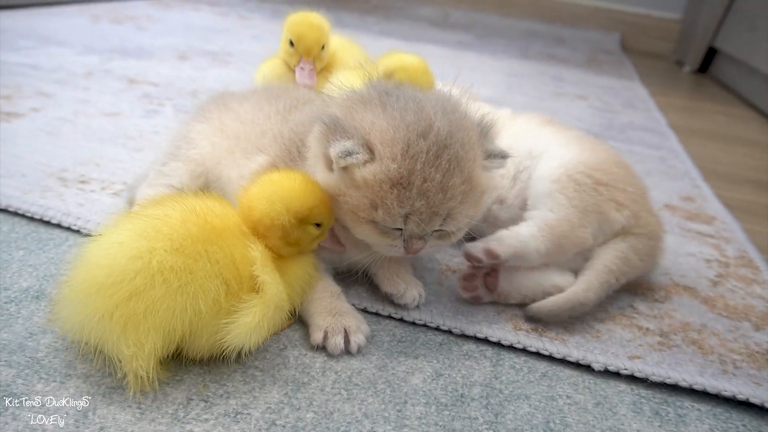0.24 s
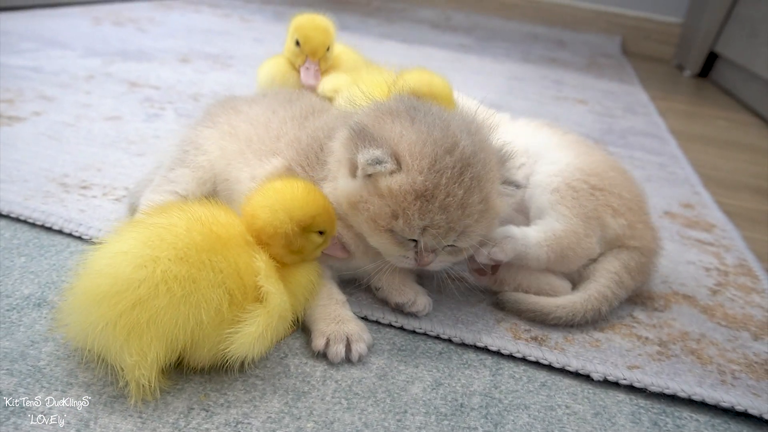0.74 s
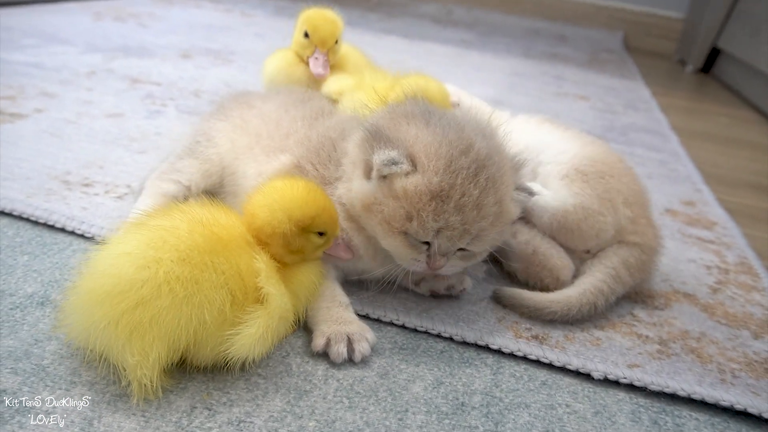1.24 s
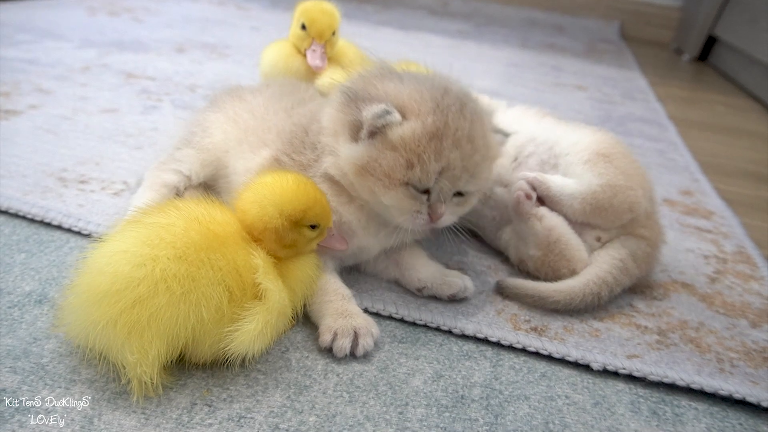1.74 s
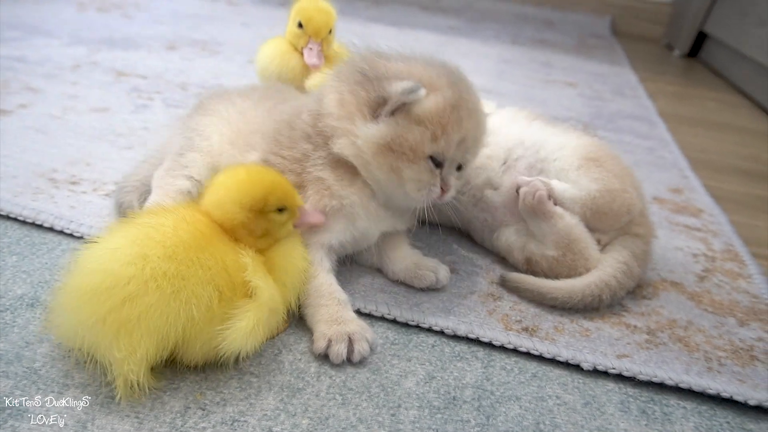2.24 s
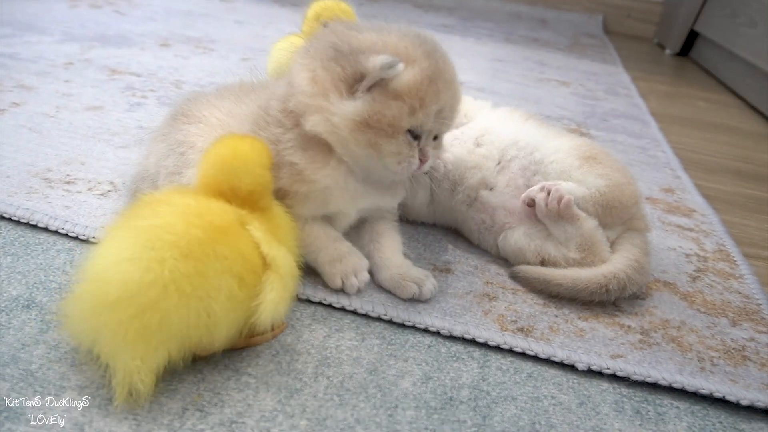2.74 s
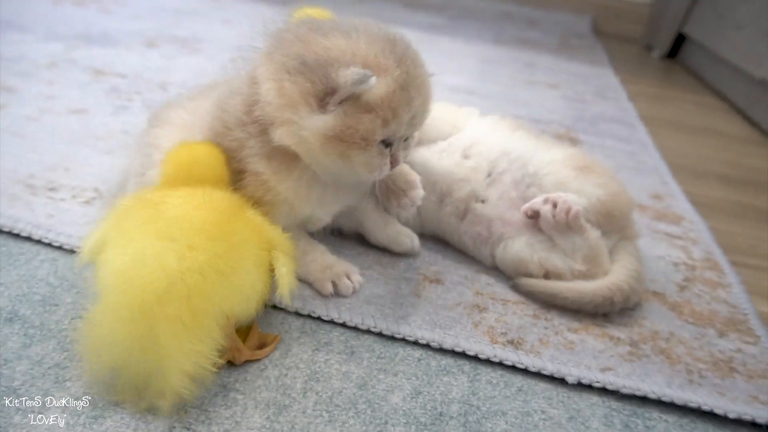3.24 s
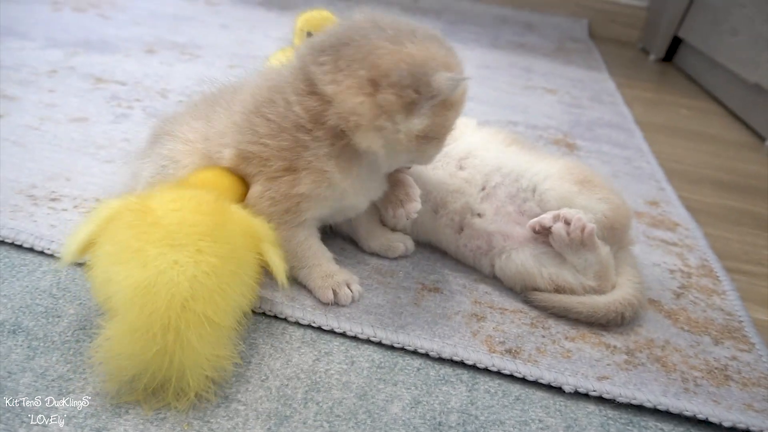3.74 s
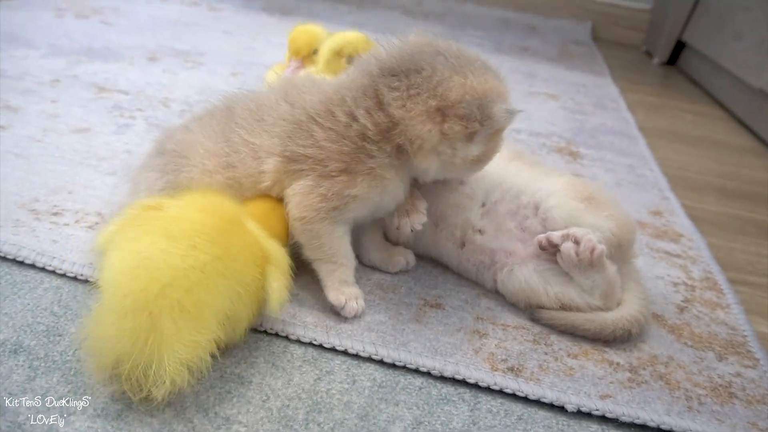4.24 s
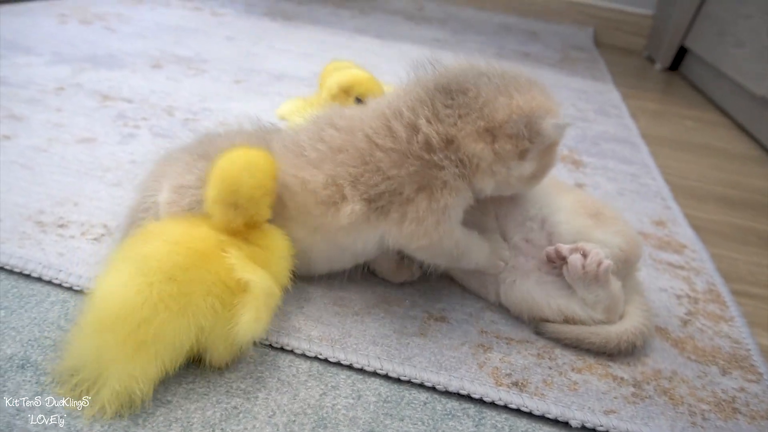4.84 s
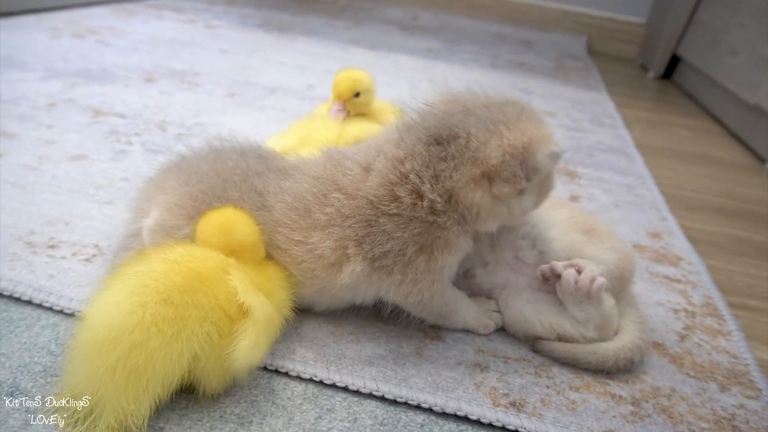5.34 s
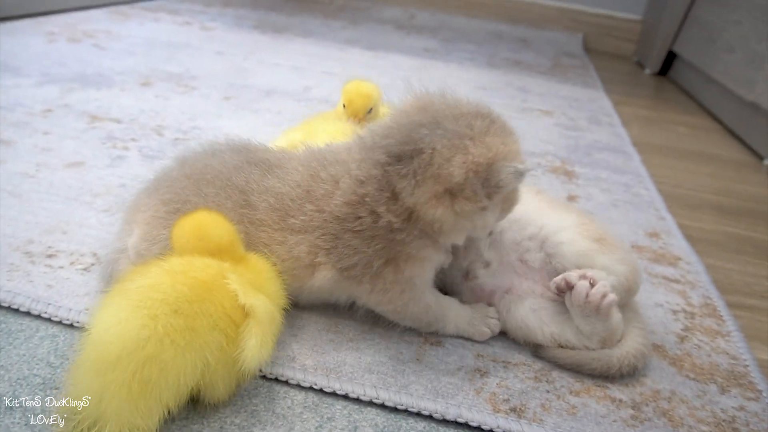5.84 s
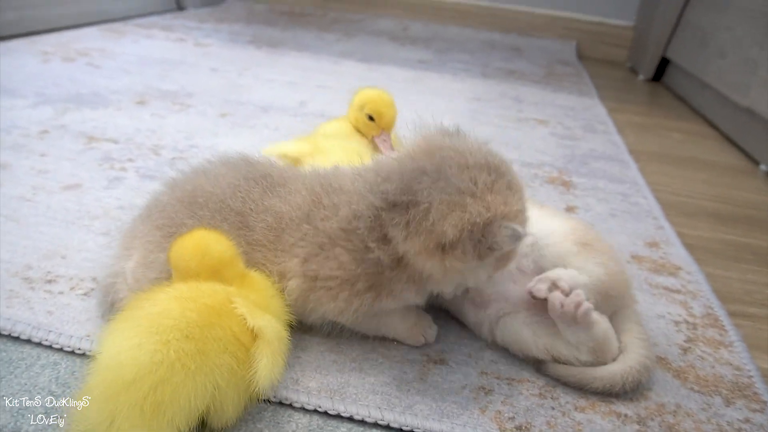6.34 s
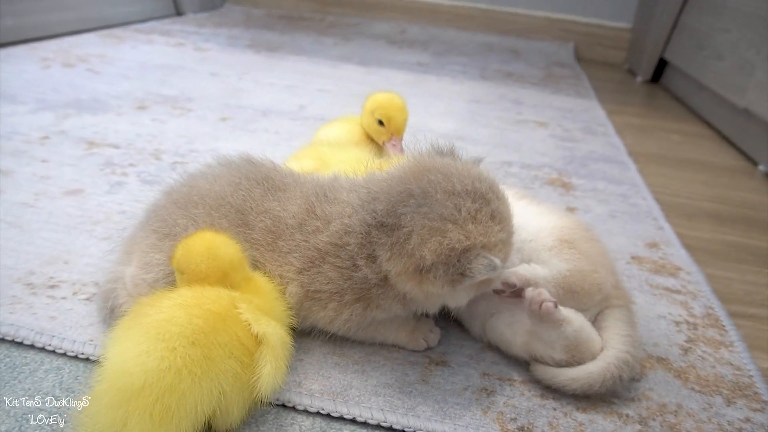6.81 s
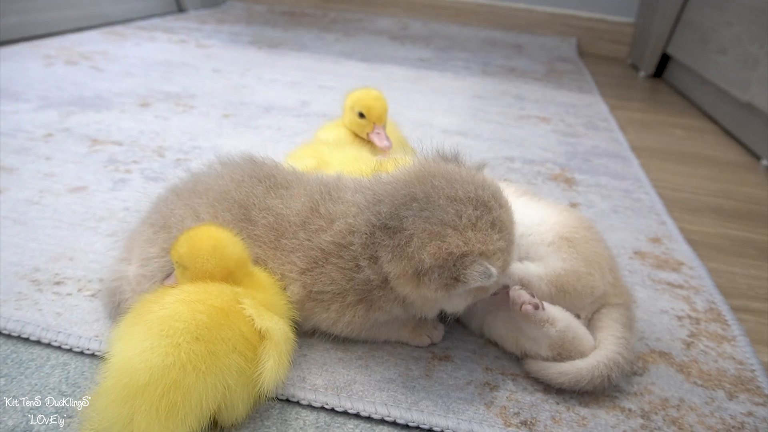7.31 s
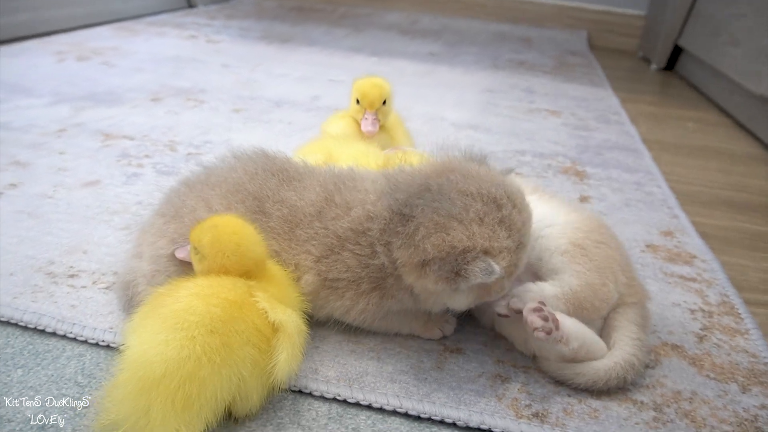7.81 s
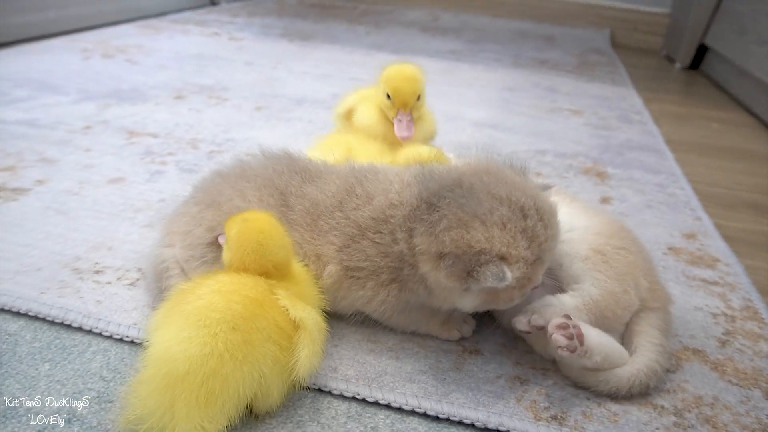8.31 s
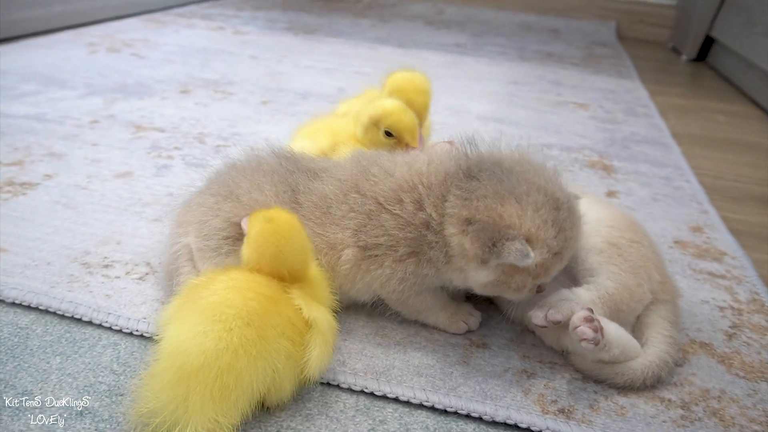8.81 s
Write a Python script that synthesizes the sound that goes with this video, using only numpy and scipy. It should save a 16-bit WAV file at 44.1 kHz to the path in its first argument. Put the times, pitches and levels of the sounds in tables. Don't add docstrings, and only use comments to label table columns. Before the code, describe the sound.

Ducklings peep close to stereo microphones in a small, quiet room with a short soft reverberation. From 0.1 s one bird calls about every 0.3 s, each peep a tenth-second whistle near 4 kHz that leaps up, holds, then drops, slightly hoarse in its middle. Short lower chirps slip between, and a thin nostril whistle is barely heard in the first second. From 1.8 to 3 s the caller softens and lowers. From 3.1 s companions answer strongly while its own peeps turn higher, weaker and raspier. A sharp tick falls at 3.4 s. At 4.8 s it bursts out loud and clear, then gradually descends, ending near 6.8 s. A quiet gap has two faint chirps around 7.5 s; from 7.9 to 9.1 s thin, shrill peeps return. Faint rug rustles, small claw ticks, soft footfalls, low appliance hum, rumble and hiss lie underneath.

```python
import sys
import numpy as np
from scipy import signal
from scipy.fft import rfft, irfft, next_fast_len
from scipy.io import wavfile
from scipy.ndimage import uniform_filter1d, map_coordinates

SR = 44100
rng = np.random.default_rng(int(sys.argv[2]) if len(sys.argv) > 2 else 0)


def to_linear_factor(level_db):
    exponent = np.asarray(level_db, float) / 20
    return 10 ** exponent


def unload_audio(sound):
    columns = np.transpose(np.atleast_2d(sound))
    steps = np.round(np.clip(columns, -1, 1) * 32767)
    wavfile.write(sys.argv[1], SR, steps.astype(np.int16))


N = 399974


def unit(x):
    return x / np.sqrt(np.mean(x ** 2) + 1e-20)


def along(points, hz):
    f, v = np.transpose(points)
    return np.interp(np.log(hz + 1), np.log(f + 1), v)


def wobble(size, rate):
    knots = rng.standard_normal(int(max(size, SR // 4) * rate / SR) + 4)
    return map_coordinates(knots, [np.arange(size) * rate / SR])


def noise(size, gain):
    m = next_fast_len(max(size, SR // 5) + 512)
    spectrum = rfft(rng.standard_normal(m)) * gain(np.fft.rfftfreq(m, 1 / SR))
    return unit(irfft(spectrum, m)[:size])


# (frequency [Hz], left-right correlation)
STEREO_LIKENESS = [(60, 1), (180, 0.91), (550, 0.078), (1650, -0.0075), (4970, 0.27), (15000, 0.25)]


def wide(gain):
    hz = np.fft.rfftfreq(N, 1 / SR)
    turn = np.arccos(np.clip(along(STEREO_LIKENESS, hz), -1, 1)) / 2
    spectrum = rfft(rng.standard_normal((2, N))) * gain(hz)
    mid, side = irfft(spectrum * [np.cos(turn), np.sin(turn)], N)
    return unit(np.array([mid + side, mid - side]))


def add(mix, s, sound, pan_db):
    part = mix[:, round(s * SR):][:, :sound.shape[-1]]
    part += to_linear_factor(np.array([[pan_db / 2], [-pan_db / 2]])) * sound[..., :part.shape[1]]


def glide(rows, bend=0.0043, edge=0.00044):
    s, hz, db = np.transpose(rows)
    t = np.arange(s[0], s[-1], 1 / SR)
    leap_s = s[1] - s[0]

    def warped(power):
        return np.where(t < s[1], s[0] + leap_s * ((t - s[0]) / leap_s) ** power, t)

    pitch = np.interp(warped(.55), s, hz)
    pitch = uniform_filter1d(pitch, int(bend * SR) + 1, mode="nearest")
    fade = np.clip(np.minimum(t - s[0], s[-1] - t) / edge, 0, 1)
    size = np.sqrt(2) * to_linear_factor(np.interp(warped(1.0), s, db)) * fade
    return 2 * np.pi * np.cumsum(pitch) / SR, size, (t - s[0]) / (s[-1] - s[0])


# (time [s], left-right difference [dB])
LEAD_HEAD = [
    (.2, -2),
    (3.2, -2.5),
    (3.4, 5),
    (4.3, 1),
    (4.9, 4),
    (5.8, 6.5),
    (6.8, 1.5),
]
# (start [s], length [s], crest pitch [Hz], level [dB], hoarse breath level [dB])
CALM = [
    (0.136, .11, 3980, -36.5, -55),
    (0.41, 0.098, 3986, -34.5, -57),
    (0.695, .113, 3990, -35.5, -55),
    (0.974, .114, 4120, -35.5, -55),
    (1.257, 0.11, 4070, -37.5, -56.5),
    (1.548, 0.095, 3920, -39, -60.5),
]
DROWSY = [
    (1.853, 0.1, 3860, -38, -59.5),
    (2.172, 0.098, 3730, -40.5, -64),
    (2.498, 0.11, 3725, -40, -58.5),
    (2.79, .104, 3850, -35.5, -56.5),
    (3.09, 0.085, 3800, -35, -61),
]
JOSTLED = [
    (3.416, 0.12, 4460, -40, -50),
    (3.692, 0.1, 4560, -41, -49.5),
    (3.956, 0.13, 4380, -44.5, -56),
    (4.238, 0.12, 4500, -46, -51.5),
    (4.511, 0.13, 4355, -42.5, -49.5),
]
ROUSED = [
    (4.803, 0.1, 4077, -30, -52.5),
    (5.099, 0.11, 4370, -31.5, -52.5),
    (5.402, 0.11, 4555, -37.5, -53.5),
    (5.724, .11, 4410, -36.5, -54.5),
    (6.048, 0.11, 4240, -37.5, -60),
    (6.369, 0.11, 4186, -36.5, -60),
    (6.735, 0.098, 3934, -38, -64.5),
]


def lead_duckling():
    moods = [(CALM, "calm"), (DROWSY, "drowsy"), (JOSTLED, "jostled"), (ROUSED, "roused")]
    return sum(duckling(peeps, kind, LEAD_HEAD) for peeps, kind in moods)


# (time [s], left-right difference [dB])
REPLY_HEAD = [
    (.6, 1),
    (2.2, -.5),
    (3, 3),
    (3.5, -3.5),
    (5.2, 0.5),
    (8.9, -1.5),
]
# (start [s], length [s], crest pitch [Hz], level [dB], hoarse breath level [dB])
ARCHES = [(3.143, .107, 3720, -32, -67), (3.735, .09, 3650, -43, -57.5), (4.025, .104, 3600, -39, -59),
          (4.29, .099, 3690, -34, -58), (4.565, .13, 3620, -34, -58), (4.885, .102, 3720, -37, -58),
          (5.195, .104, 3700, -43, -59.5), (7.975, .064, 3560, -51, -72), (3.445, .082, 3700, -38, -64),
          (4.345, .082, 4620, -50, -64), (4.685, .083, 4670, -50, -61)]
CHIRPS = [(0.482, .047, 3093, -44.5, -72), (0.618, .062, 3870, -43, -98), (1.13, .06, 2470, -42, -72),
          (1.273, .057, 2730, -40.5, -66), (1.535, .045, 2570, -42.5, -70), (2.058, .047, 2500, -39, -69),
          (2.18, .069, 3036, -39, -72), (2.562, .056, 2704, -40, -104), (2.622, .05, 3100, -43, -91),
          (2.713, .076, 3110, -36, -79.5), (2.875, .05, 3300, -42.5, -79), (7.452, .052, 3510, -47.5, -102),
          (7.597, .049, 3550, -47.5, -95), (8.866, .068, 3260, -38.5, -67.5)]
SHRILL = [
    (7.946, .1, 4950, -56, -62),
    (8.227, 0.099, 4650, -44, -66.5),
    (8.503, .1, 4620, -43.5, -62.5),
    (8.768, 0.12, 4820, -42.5, -57.5),
    (8.808, .066, 3870, -45, -60),
    (9.048, 0.067, 4690, -41.5, -59),
]


def companions():
    voices = [(ARCHES, "arch"), (CHIRPS, "chirp"), (SHRILL, "shrill")]
    return sum(duckling(peeps, kind, REPLY_HEAD) for peeps, kind in voices)


# (frequency [Hz], gain [dB])
BEAK = [(2000, -8.5), (2500, -0.5), (3000, -1), (3400, -6), (3650, 1.5), (3950, -2.5), (4250, -1.5),
        (4700, -2.5)]
# (frequency [Hz], density [dB per Hz])
BREATH = [(500, -25), (850, -4.5), (1400, -2), (2800, 1.5), (5000, 4), (6000, -6), (8500, -9),
          (10000, -11.5), (15500, -30.5)]
SHAPES = dict( calm=dict(start=.67, leap_s=.02, shelf=.905, rest=.5, peak=.78, droop=.965, fall_s=.03, halfway=.46, end_hz=2350),
          drowsy=dict(start=.68, leap_s=.017, shelf=.875, rest=.1, peak=.82, droop=.985, fall_s=.036, halfway=.48, end_hz=2350),
          jostled=dict(start=.66, leap_s=.019, shelf=.92, rest=.15, peak=.7, droop=.95, fall_s=.028, halfway=.48, end_hz=2450),
          roused=dict(start=.64, leap_s=.019, shelf=.895, rest=.12, peak=.58, droop=.955, fall_s=.028, halfway=.5, end_hz=2400),
          arch=dict(start=.7, leap_s=.018, shelf=.945, rest=.35, peak=.78, droop=.97, fall_s=.029, halfway=.5, end_hz=2300),
          chirp=dict(start=.85, leap_s=.012, shelf=.98, rest=.2, peak=.6, droop=.97, fall_s=.07, halfway=.62, end_hz=2000),
          shrill=dict(start=.62, leap_s=.023, shelf=.965, rest=.1, peak=.45, droop=.94, fall_s=.05, halfway=.68, end_hz=2550))
# (first overtone [dB], onset [dB], shelf [dB], mid-fall [dB], fall end [dB])
LEVELS = dict(calm=(-19.5, -9.5, -2, -1.5, -2.5), drowsy=(-19, -12.5, -5, -3.5, -4.5),
          jostled=(-18, -3.5, -1.5, -1.5, -5.5), roused=(-22, -11, -2.5, -3.5, -7.5),
          arch=(-21, -16, -3.5, 0, -3.5), chirp=(-21.5, -7, -5, -2, -4.5), shrill=(-15.5, -4.5, 2, 5, -1.5))


def duckling(peeps, kind, head):
    mix = np.zeros((2, N))
    octave_db, *contour_db = LEVELS[kind]
    for s, length, crest_hz, level_db, breath_db in peeps:
        rows = arch(s, length, crest_hz, level_db, contour_db, **SHAPES[kind])
        phase, size, progress = glide(rows)
        n = len(phase)
        beak = to_linear_factor(along(BEAK, np.gradient(phase) * SR / (2 * np.pi)))
        effort = np.clip(np.minimum((progress - .12) / .22, (.85 - progress) / .3), 0, 1)
        loudest_db = max(row[2] for row in rows)
        rough = effort * min(to_linear_factor(breath_db - loudest_db + 8.5), .38)

        phase = phase + rough * wobble(n, 1208)
        phase = phase + (.2 + .25 * effort + 1.8 * rough) * wobble(n, 260)
        phase = phase + crest_hz / 4000 * effort * wobble(n, 75)
        tone = beak * np.sin(phase) * to_linear_factor((2.44 + 2.5 * rough) * wobble(n, 221))

        for k, db in enumerate([0, -9, -21]):
            richness = (0.81 + 0.12 * effort) ** (1 + k) * (size / to_linear_factor(-48.0)) ** (0.12 * k)
            overtone = to_linear_factor(octave_db + db + 4.54 * wobble(n, 87)) * np.sin((k + 2) * phase)
            tone += richness * overtone

        period = rng.integers(2, 4)
        under = np.zeros(n)
        for k in (period - 1, period + 1):
            patches = to_linear_factor(4 * wobble(n, 61))
            under += patches * np.sin(k / period * phase + 1.2 * wobble(n, 300))

        puffs = to_linear_factor(1.8 * wobble(n, 450) + 2.5 * wobble(n, 45))
        air = noise(n, lambda hz: to_linear_factor(along(BREATH, hz))) * puffs
        hoarse = to_linear_factor(breath_db) * (to_linear_factor(7.5) * air + to_linear_factor(-5.5) * under)
        call = size * tone + effort * hoarse
        pan_db = np.interp(s, *np.transpose(head))
        add(mix, s, call, pan_db)
        add(mix, s, room(call), 0.19 * pan_db)
    return mix


def arch(s, length, crest_hz, db, levels, start, leap_s, shelf, rest, peak, droop, fall_s, halfway, end_hz):
    onset_db, shelf_db, falling_db, end_db = levels
    cut_s, cut_db = 0.0084, -3.5
    hold = max(length - leap_s - fall_s, .011)
    drop = leap_s + hold
    end = end_hz / crest_hz
    middle = droop + halfway * (end - droop)
    last = end + (middle - end) * 2 * cut_s / (length - drop)
    corners = [(0, start, onset_db),
               (leap_s, shelf, shelf_db),
               (leap_s + rest * hold, .985 * shelf, shelf_db / 2),
               (leap_s + peak * hold, 1, 0),
               (drop, droop, falling_db / 4),
               ((drop + length) / 2, middle, falling_db),
               (length - cut_s, last, end_db),
               (length, end, end_db + cut_db)]
    return [(s + t, crest_hz * share, db + under_db) for t, share, under_db in corners]


# (time [s], rustle level [dB], rumble level [dB])
RUSTLE = [(0, -77, -64), (.08, -78, -56), (.7, -67.5, -59), (1.5, -76, -60), (1.77, -70.5, -58.5),
          (2.3, -79.5, -60), (3.05, -72.5, -59.5), (3.3, -75.5, -60), (3.65, -74, -60.5), (4.5, -67.5, -58),
          (5.6, -73.5, -60.5), (7, -84, -60), (9.07, -76.5, -60.5)]
# (frequency [Hz], density [dB per Hz])
RUG = [(300, -28.5), (700, -4.5), (1500, -7.5), (3500, -3), (6000, -15.5), (12000, -19.5), (16000, -31)]
# (time [s], scrape level [dB], snap level [dB])
TICKS = [(0.109, -56, -65.5), (1.0058, -54, -41), (1.724, -48.5, -63), (1.735, -62, -59),
         (1.8064, -54.5, -67), (1.921, -77, -42), (2.02, -58, -65), (2.948, -64, -63), (3.024, -53, -63),
         (3.0542, -53.5, -65), (3.3104, -56, -75), (3.3217, -57, -62.5), (3.4013, -49.5, -35.5),
         (3.8872, -61, -62), (3.9313, -57, -67), (4.2424, -53, -48.5), (7.6188, -78, -64), (7.72, -68, -68),
         (8.783, -65, -46)]
# (time [s], level [dB])
THUDS = [
    (3.055, -48),
    (4.467, -48),
    (5.39, -48),
    (7.237, -50),
    (8.174, -45),
    (8.207, -45.5),
]


def rug():
    s, db, _ = np.transpose(RUSTLE)
    level = np.interp(np.arange(N) / SR, s, db) + 3 * wobble(N, 14) + 2.55 * wobble(N, 90)
    mix = to_linear_factor(level + 7.0) * wide(lambda hz: to_linear_factor(along(RUG, hz)))
    t = np.arange(SR // 10) / SR

    def band(centre_hz, width_hz):
        return noise(len(t), lambda f: np.exp(-((f - centre_hz) / width_hz) ** 2))

    for s, scrape_db, snap_db in TICKS:
        scrape = to_linear_factor(scrape_db - 60 * t / .05 + 3.66 * wobble(len(t), 510)) * band(2200, 2230)
        snap = to_linear_factor(snap_db - 1.0 - 60 * t / 0.018) * band(8000, 6000)
        add(mix, s, scrape + snap, -2.5)
    for s, db in THUDS:
        add(mix, s, to_linear_factor(db - 4.5 - 60 * t / 0.032) * band(200, 610), -.4)
    return mix


# (time [s], pitch [Hz], level [dB])
WHISTLES = [
    [(.4, 4900, -61), (.45, 5200, -84), (.54, 5100, -73)],
    [(.52, 4650, -68), (.6, 4760, -64), (.665, 4880, -64), (.72, 4700, -72)],
    [(.83, 6450, -79), (.9, 6500, -71), (1.1, 6500, -69), (1.2, 6400, -78)],
]


def nose():
    mix = np.zeros((2, N))
    for rows in WHISTLES:
        phase, size, _ = glide(rows, bend=0.02, edge=0.013)
        n = len(phase)
        flow = size * to_linear_factor(2.5 * wobble(n, 42))
        add(mix, rows[0][0], flow * np.sin(phase + .6 * wobble(n, 153)), -1.5)
    return mix


# (frequency [Hz], 60 dB decay time [s])
WALLS = [(500, 0.24), (3000, 0.2), (8000, 0.18), (15000, 0.23)]


def room(x):
    hz, t, z = signal.stft(rng.standard_normal((2, SR // 3)), SR, nperseg=128)
    decay = to_linear_factor(-60 * t / along(WALLS, hz)[:, None])
    tail = signal.istft(z * decay, SR, nperseg=128)[1]
    tail *= 1 - np.exp(-np.arange(tail.shape[1]) / (0.0011 * SR))
    tail *= to_linear_factor(-2.5) / np.linalg.norm(tail[0])
    tail[:, rng.integers(20, 90, size=3)] += to_linear_factor(-14) * rng.standard_normal((2, 3))
    return signal.fftconvolve(x[None], tail, axes=1)


# (frequency [Hz], density [dB per Hz])
QUIET = [(13, -55), (22, -54), (44, -8), (92, -11), (132, -8), (169, -18), (211, -12.5), (256, -15.5),
         (328, -20), (366, -19), (602, -17.5), (815, -22), (1970, -29), (2200, -32.5), (16000, -39)]
# (frequency [Hz], width [Hz], level [dB])
HUM = [
    (88, 11.7, -64.5),
    (137, 26.4, -68.5),
    (593, 76, -75.5),
]


def floor():
    def bed(hz):
        return to_linear_factor(along(QUIET, hz))

    hums = np.zeros((2, N))
    for centre_hz, width_hz, db in HUM:
        hums += to_linear_factor(db) * wide(lambda f: 1 / (1 + (2 * (f - centre_hz) / width_hz) ** 2))
    s, _, rumble_db = np.transpose(RUSTLE)
    load = to_linear_factor(np.interp(np.arange(N) / SR, s, rumble_db) - 2.5)
    bass = load * wide(lambda hz: bed(hz) / (1 + (hz / 700) ** 2))
    hiss = to_linear_factor(-67.5) * wide(lambda hz: bed(hz) / (1 + (700 / (hz + 1)) ** 2))
    return bass + hums + hiss


def scene():
    birds = lead_duckling() + companions()
    near = rug() + nose()
    return birds + near + room(near.mean(0))[:, :N] + floor()


def band_limit(x):
    return signal.sosfilt(signal.butter(12, 16430, fs=SR, output="sos"), x)


def record(dry):
    passed = np.fft.rfftfreq(N, 1 / SR) < 15800
    mix = irfft(rfft(dry) * passed, N)
    return band_limit(mix)


dry = scene()
out = record(dry)
unload_audio(out)
```